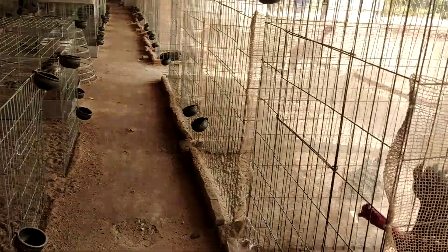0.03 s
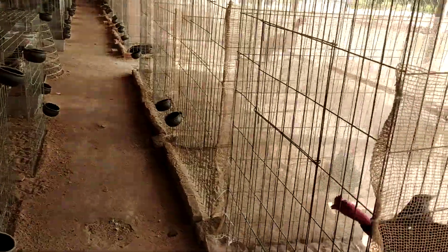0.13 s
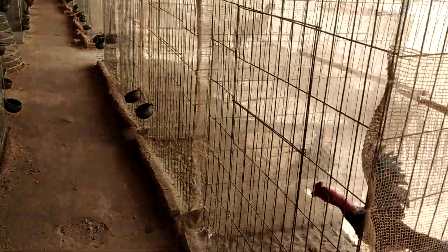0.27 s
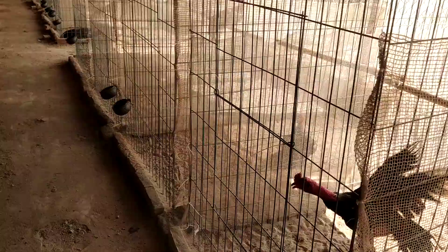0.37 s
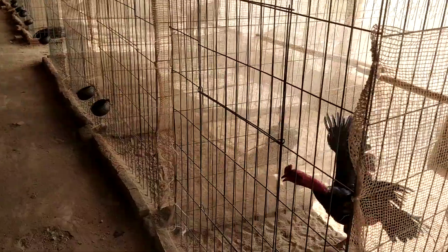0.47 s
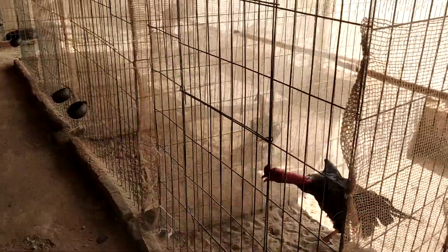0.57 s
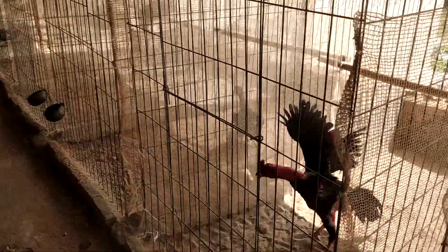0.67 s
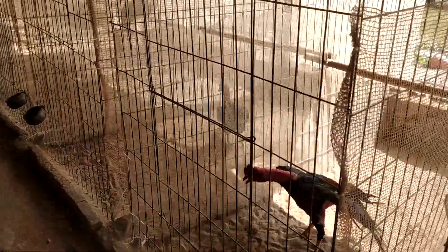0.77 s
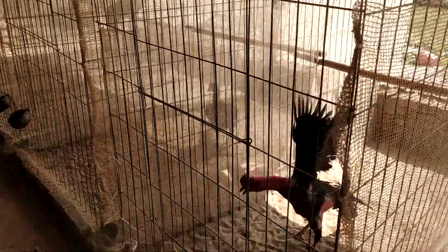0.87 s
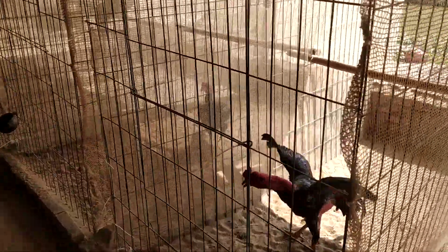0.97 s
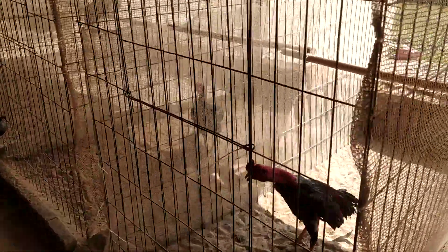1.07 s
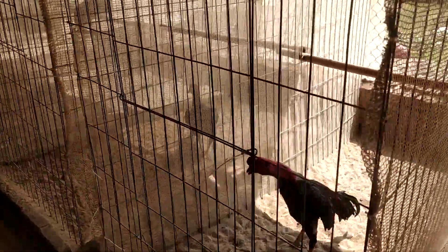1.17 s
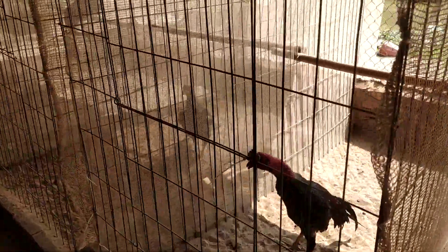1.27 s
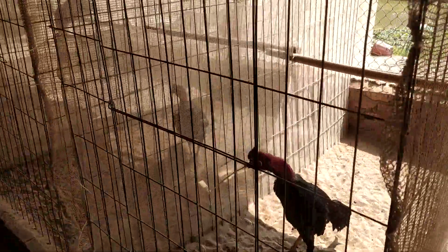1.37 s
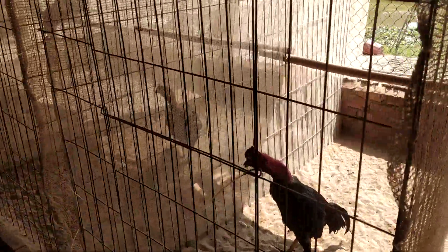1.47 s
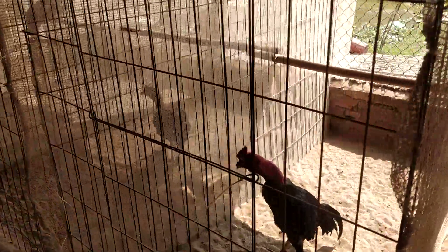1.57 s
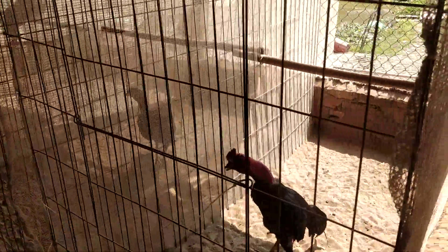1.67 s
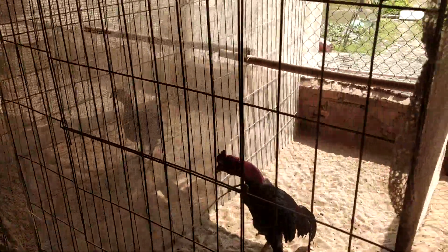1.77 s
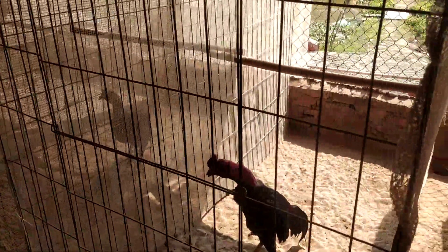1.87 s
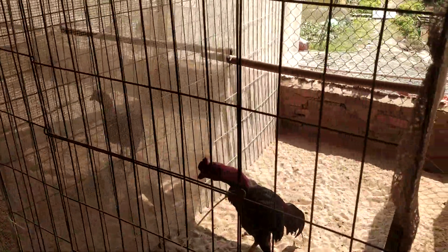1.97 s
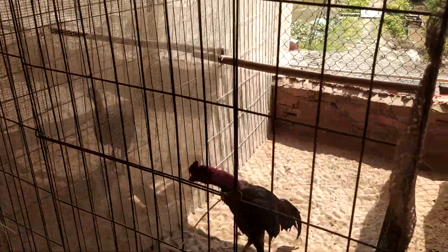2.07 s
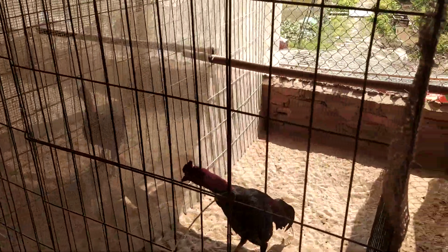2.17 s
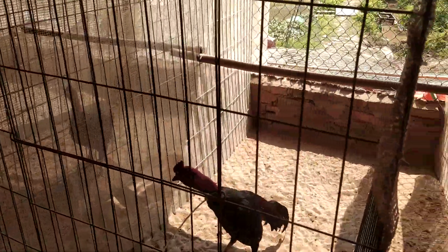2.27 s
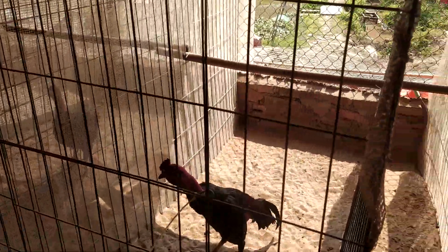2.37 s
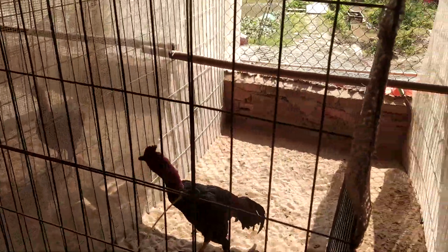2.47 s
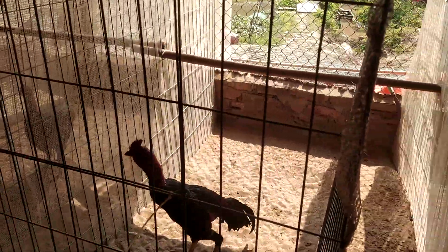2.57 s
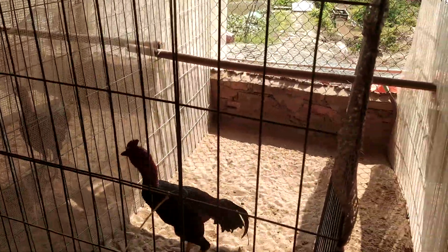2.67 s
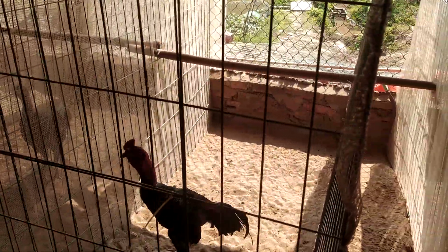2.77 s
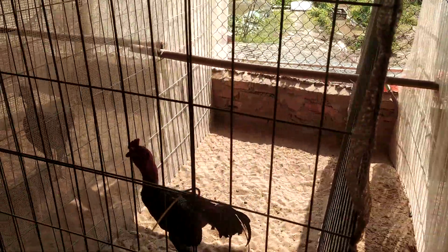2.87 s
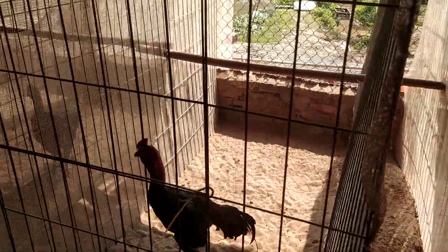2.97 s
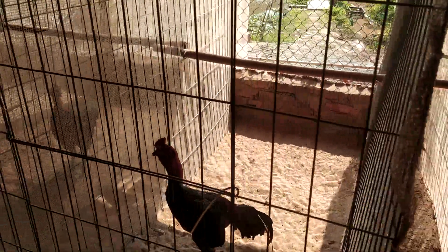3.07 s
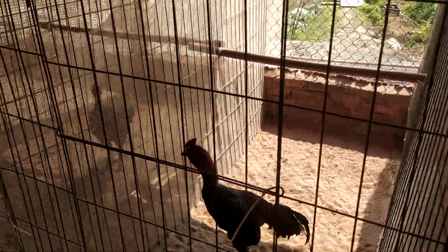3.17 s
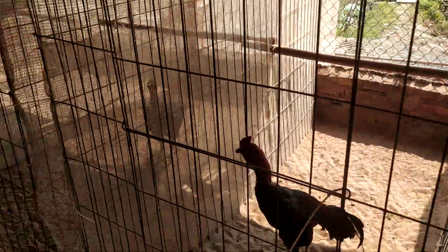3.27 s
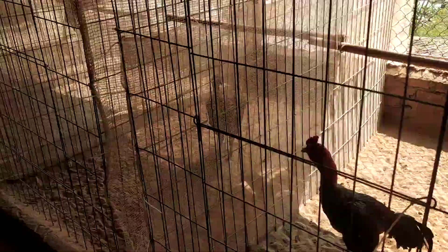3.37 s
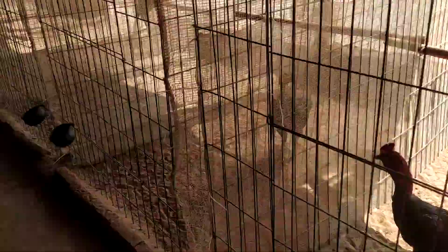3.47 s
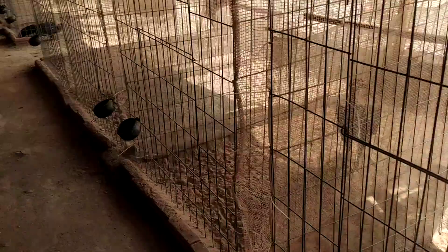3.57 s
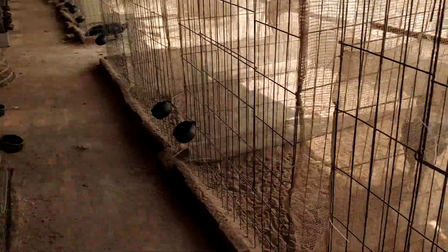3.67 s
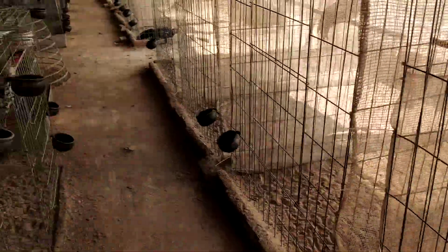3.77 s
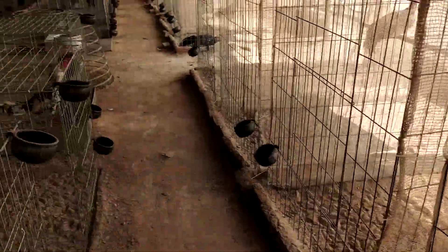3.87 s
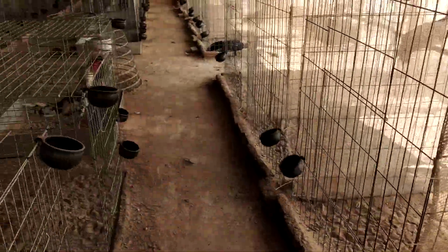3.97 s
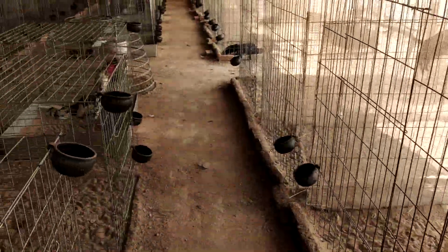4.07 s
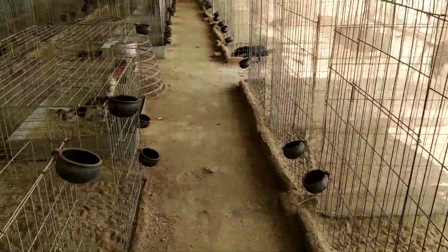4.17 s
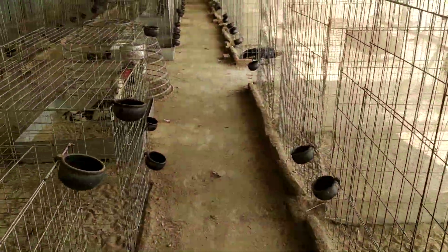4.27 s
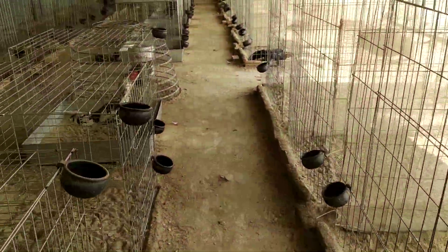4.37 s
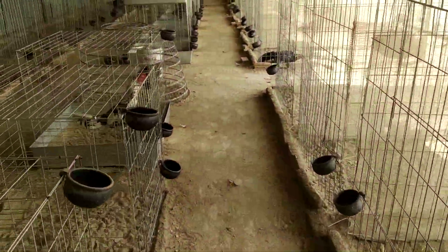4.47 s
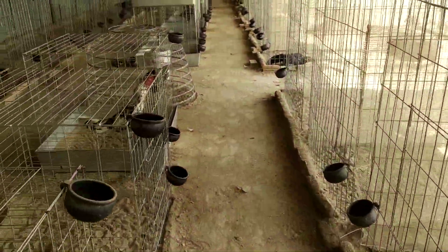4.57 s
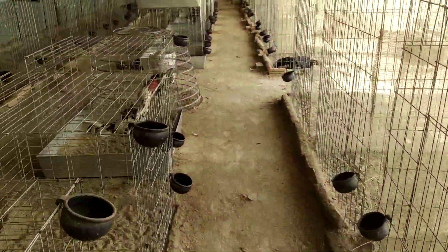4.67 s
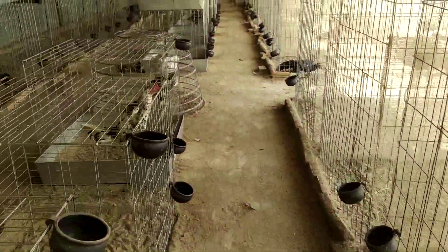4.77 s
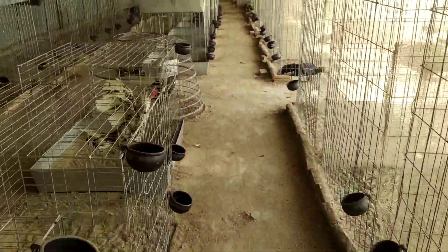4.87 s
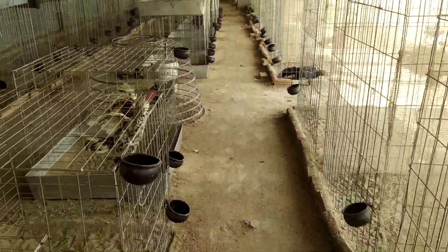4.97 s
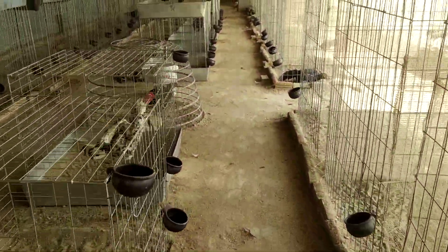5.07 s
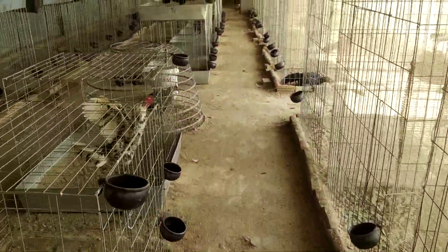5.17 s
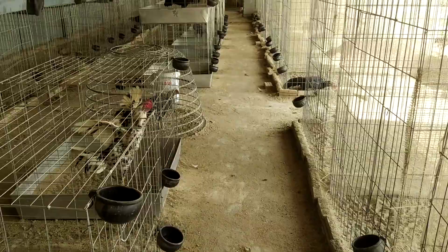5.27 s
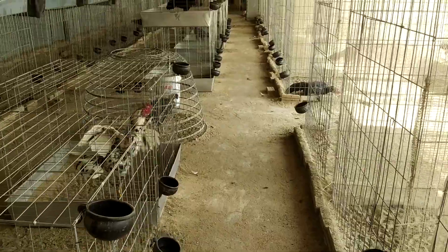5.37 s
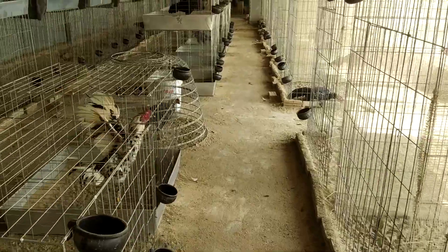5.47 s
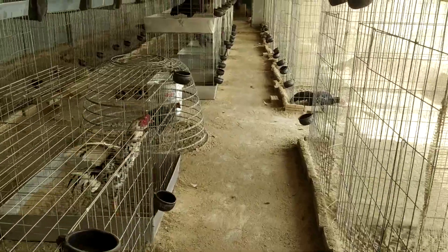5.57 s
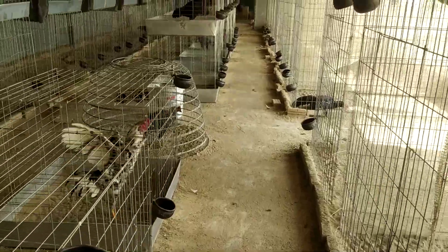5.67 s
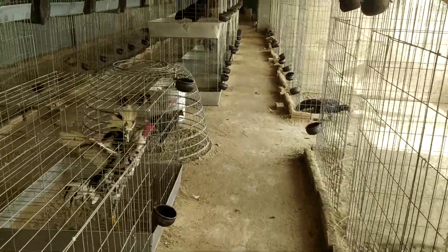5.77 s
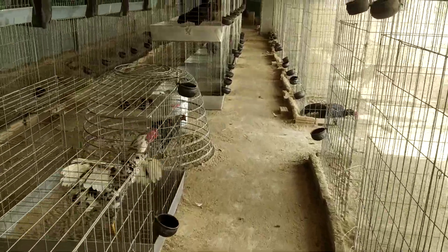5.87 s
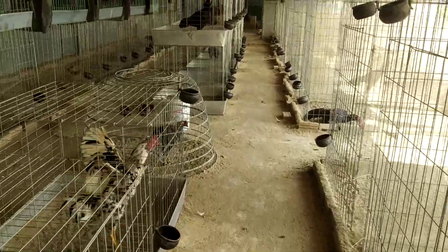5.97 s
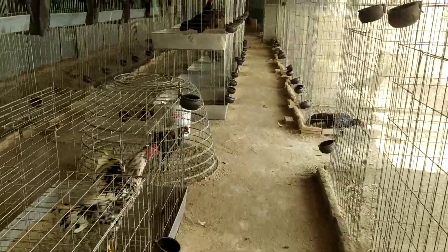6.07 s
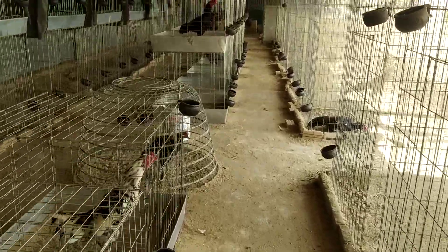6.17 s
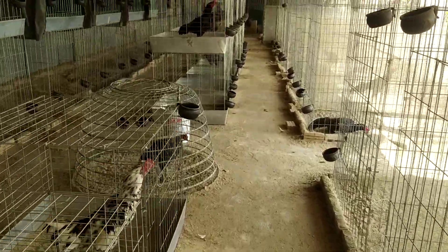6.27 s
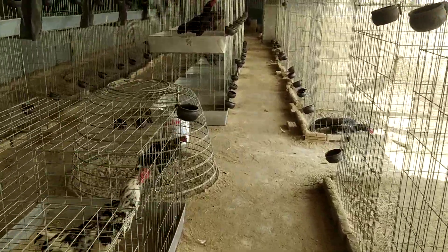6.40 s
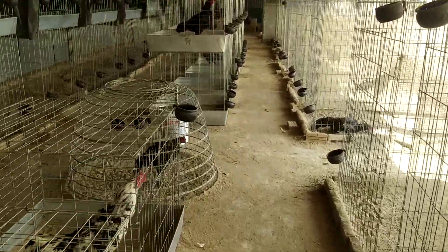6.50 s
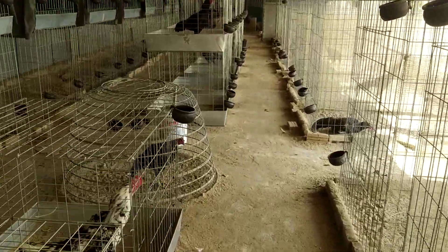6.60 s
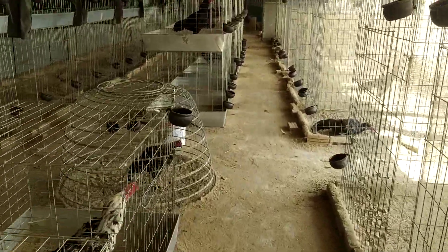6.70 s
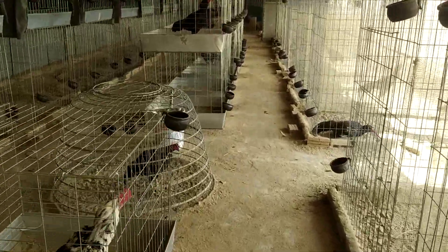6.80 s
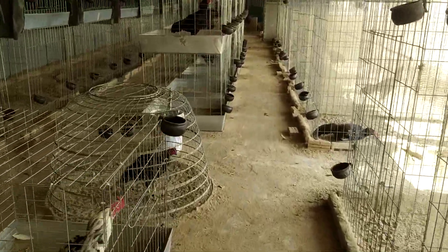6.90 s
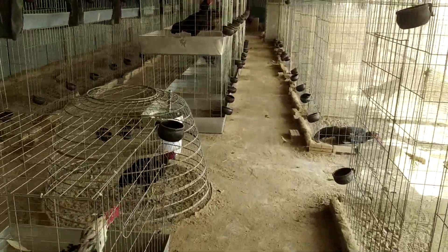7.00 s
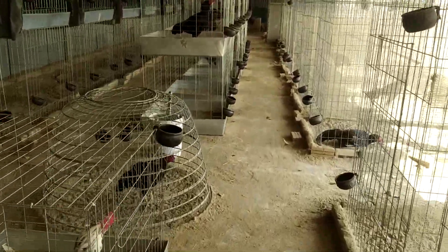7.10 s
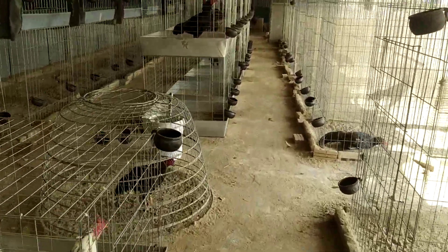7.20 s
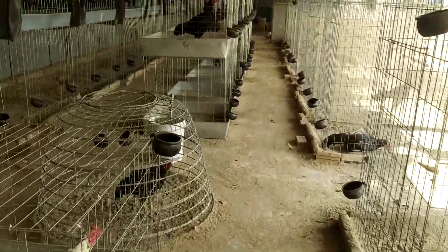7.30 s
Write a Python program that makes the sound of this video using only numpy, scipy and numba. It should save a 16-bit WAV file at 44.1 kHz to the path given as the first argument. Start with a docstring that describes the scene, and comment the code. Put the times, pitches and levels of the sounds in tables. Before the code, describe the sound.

A close rooster claps its wings five times and crows hoarsely, then two more answer from down the aisle of a poultry shed.

```python
"""A far bird calls and a rooster close by claps its wings five times, in a poultry shed with rows of wire cages.
The rooster crows in four syllables; two more down the aisle answer, overlapping. Feet scuff the gritty
floor, cages tick, far birds call and an engine throbs outside. Crows are sharp pulses, roughened and sent
through throat resonances; far calls are nearly pure tones; wings and floor are short bursts of shaped
noise; the engine is a train of dull beats. Reflections of the shed surround all but the outdoor sounds."""
import sys
import numpy as np
from scipy import signal
from scipy.fft import rfft, irfft, next_fast_len
from scipy.io import wavfile
from scipy.ndimage import uniform_filter1d
from numba import njit

SR = 44100
rng = np.random.default_rng(int(sys.argv[2]) if len(sys.argv) > 2 else 0)


def waveform_to_disk(signal):
    """Save audio, clipped to [-1, 1], as 16-bit WAV at the path in sys.argv[1]."""
    frames = np.transpose(np.atleast_2d(signal))
    scaled = np.clip(frames, -1, 1) * 32767
    samples = np.round(scaled).astype(np.int16)
    wavfile.write(sys.argv[1], SR, samples)


N = 323677
T = np.arange(N) / SR


def from_db(db):
    """Turns decibels into a factor of amplitude."""
    return 10 ** (np.asarray(db) / 20)


def rms_one(x):
    """Scales a signal to an rms level of 1."""
    return x / np.sqrt(np.mean(x ** 2) + 1e-20)


def in_time(rows):
    """The columns of a table, joined by straight lines."""
    s, *columns = np.transpose(rows)
    return [np.interp(T, s, c) for c in columns]


def cut(x, hz, kind, order=2):
    """Removes the sound on one side of a frequency, or inside or outside a band."""
    return signal.sosfilt(signal.butter(order, hz, kind, fs=SR, output="sos"), x)


def drift(rate_hz):
    """Random wander up to the given rate; spread 1."""
    settled = cut(rng.standard_normal(N + SR), rate_hz, "low")[SR:]
    return rms_one(settled)


def resonate(x, hz, width_hz):
    """One resonance with gain 1 on top."""
    r = np.exp(-np.pi * width_hz / SR)
    top = np.array([1, 0, -1]) * (1 - r * r) / 2
    bottom = [1, -2 * r * np.cos(2 * np.pi * hz / SR), r * r]
    return signal.lfilter(top, bottom, x + 1e-18)


@njit
def moving_resonance(x, hz, width_hz):
    """A resonance whose centre moves; gain 1 on top."""
    r = np.exp(-np.pi * width_hz / SR)
    y = np.zeros(len(x))
    for i in range(2, len(x)):
        drive = (1 - r * r) / 2 * (x[i] - x[i - 2])
        y[i] = drive + 2 * r * np.cos(2 * np.pi * hz[i] / SR) * y[i - 1] - r * r * y[i - 2]
    return y


def at_hz(points, hz):
    """Reads a curve at any frequency, along a logarithmic frequency scale."""
    known_hz, values = np.transpose(points)
    return np.interp(np.log(hz + 1), np.log(known_hz), values)


def arch(start, length, t=T):
    """A rounded swell from 0 to 1 and back."""
    return np.sqrt(np.sin(np.pi * np.clip((t - start) / length, 0, 1)).clip(0))


def bursts(times, levels_db, rise_s, t60):
    """Envelope of blows that swell quickly and die away by 60 dB in t60 seconds."""
    out = np.zeros(N)
    for s, db in zip(times, levels_db):
        span = slice(max(0, int((s - .1) * SR)), int((s + .4) * SR))
        age = T[span] - s
        decay = from_db(db - 60 * np.maximum(age, 0) / t60)
        out[span] += decay * np.exp(-(np.minimum(age, 0) / rise_s) ** 2)
    return out


# How alike the two channels are in the shed.
# Each row: frequency in Hz, coherence from 0 (unrelated) to 1 (the same).
LIKENESS = [(100, 0.96), (600, 0.78), (1400, 0.26), (3000, 0.037), (10000, 0.029)]


def diffuse(spectrum=None, size=N):
    """Stereo noise arriving from all sides: alike in the bass, unrelated in the treble; rms 1."""
    length = next_fast_len(size)
    hz = np.fft.rfftfreq(length, 1 / SR)
    mid, side = rfft(rng.standard_normal((2, length)))
    alike = np.clip(at_hz(LIKENESS, hz), 0, 1)
    both = np.sqrt(1 + alike) * mid + np.sqrt(1 - alike) * side * [[1], [-1]]
    if spectrum is not None:
        # beyond both ends of the given spectrum the noise falls away
        ends = (1 + (spectrum[0][0] / (hz + 1)) ** 4) * (1 + (hz / spectrum[-1][0]) ** 4)
        both = both * from_db(at_hz(spectrum, hz)) / np.sqrt(ends)
    return rms_one(irfft(both, length)[:, :size])


SHED_T60_S, SHED_TREBLE_T60_S = 0.38, 0.23


def shed(x, wet_db, pan_db):
    """Direct sound plus the dense reflections of floor, walls and roof; the treble dies first."""
    age = T[:SR // 2]
    noise = diffuse(size=len(age))
    low = cut(noise, 1600, "low", order=1)
    low_tail = low * from_db(-60 * age / SHED_T60_S)
    treble_tail = (noise - low) * from_db(-60 * age / SHED_TREBLE_T60_S)
    tail = (low_tail + treble_tail) * (age > .003)
    tail = rms_one(tail) / np.sqrt(len(age))
    x = x * np.ones((2, 1))
    wet = signal.fftconvolve(x, tail, axes=1)[:, :N]
    direct = x * from_db([[pan_db / 2], [-pan_db / 2]])
    return (direct + from_db(wet_db) * wet) / np.sqrt(1 + from_db(2 * wet_db))


# Colour of the outdoor background. Each row: frequency in Hz, relative level in dB per Hz.
OUTDOOR_COLOUR = [(50, -2), (66, 0), (100, -5.5), (160, -5), (240, -8.5), (350, -18), (580, -11.5),
                  (900, -29), (1500, -25.5), (3000, -35.5), (9000, -34), (15500, -41.5)]
OUTDOOR_DB = -54


def outdoor_background():
    """A steady murmur from all sides, made of shaped noise."""
    return from_db(OUTDOOR_DB) * diffuse(OUTDOOR_COLOUR)


# Loudness of the engine as the microphone turns. Each row: time in seconds, level in dB.
ENGINE_LEVEL = [(1.5, -66), (2.3, -55.5), (4.4, -53.5), (6.0, -59.5)]


def engine(firings_hz):
    """A far single-cylinder engine: dull exhaust beats that swell and fade as the microphone turns."""
    beats = np.diff(np.floor(T * firings_hz), prepend=0)   # one click per firing
    boom = resonate(resonate(beats, 120, 140), 120, 140)
    exhaust = cut(boom, 180, "low", order=4)
    level_db, = in_time(ENGINE_LEVEL)
    return from_db(level_db) * rms_one(exhaust)


def whistle(notes, overtones_db, waver):
    """Nearly pure notes, with or without weak overtones; each swells once and bends through three pitches."""
    out, unsteady = np.zeros(N), 1 + waver * drift(119)
    for s, length, first_hz, middle_hz, last_hz, db in notes:
        span = slice(max(0, int(s * SR)), int((s + length) * SR))
        bend = np.polyfit([0, .5, 1], [first_hz, middle_hz, last_hz], 2)
        pitch = np.polyval(bend, (T[span] - s) / length) * unsteady[span]
        phase = 2 * np.pi * np.cumsum(pitch) / SR
        overtones = sum(from_db(level) * np.sin(k * phase) for k, level in enumerate(overtones_db, 2))
        out[span] += np.sqrt(2) * from_db(db) * arch(s, length, T[span]) * (np.sin(phase) + overtones)
    return out


# Calls and a cluck of far birds. Each row: start in seconds, length in seconds,
# first, middle and last pitch in Hz (before a slight waver), relative level in dB.
FAR_CALLS = [(0.0, 0.33, 1516, 1521, 1470, -41), (2.42, 0.28, 653, 615, 590, -65),
             (2.5, 0.26, 1126, 1220, 1260, -64), (2.48, .2, 1890, 1810, 1750, -67),
             (2.577, 0.023, 539, 491, 430, -37.5), (3.07, 0.26, 1830, 1770, 1725, -72),
             (3.95, 0.13, 400, 420, 442, -51.5), (3.97, 0.26, 574, 651, 673, -58.5),
             (6.8, 0.3, 1150, 1178, 1217, -57.5), (7.0, 0.28, 1187, 1200, 1210, -50.5),
             (7.24, 0.11, 1180, 1165, 1160, -60)]


def far_birds():
    """Far birds: nearly pure notes with two weak overtones, softened by the shed."""
    calls = whistle(FAR_CALLS, overtones_db=[-24, -32], waver=0.019)
    return shed(calls, wet_db=-2.5, pan_db=-1.5)


# Colours of the wing slap, the feathers and the swept air.
# Each row: frequency in Hz, relative level in dB per Hz.
SLAP = [(120, -28), (200, 10), (362, -4), (729, 2.5), (967, -3), (1490, -1.5), (2290, -7.5), (3080, -9.5),
        (5000, -32), (6500, -45), (11000, -120)]
FEATHER = [(1470, -25.5), (2400, -1.5), (3060, -12), (3660, -9), (9810, -4.5), (15000, -14), (16000, -22)]
AIR = [(47, -24.5), (80, -8.5), (199, 0.5), (343, -10), (424, 0.5), (549, -12), (658, -7), (2000, -13),
       (3000, -21.5), (6600, -32.5)]
# Wing claps. Each row: time in seconds, then relative levels in dB of the snap, the slap,
# the air thump and the feather crack.
CLAPS = [(0.043, -9.5, -31, -37.5, -25), (0.251, -8, -30.5, -40, -28.5), (0.471, -7.5, -31, -38, -35.5),
         (0.701, -43, -31, -41.5, -26), (0.941, -17, -27.5, -35, -20)]
# The wings sweep up before each clap and down after it.
# Each row: delay from the clap in seconds, air level in dB, feather level in dB.
WING_BEAT = [(-.038, -38, -41), (.072, -46, -62)]
# Loose shakes of the feathers. Each row: time in seconds, air level in dB, feather level in dB.
RUFFLES = [(.005, -46, -44), (.377, -48, -47.5), (.633, -47.5, -56)]
# Stiff feathers flick against each other between the claps.
# Each row: time in seconds, crack level in dB, slap level in dB.
FLICKS = [(.054, -21, -24), (0.21, -30, -43), (0.374, -58, -30.5), (0.429, -37, -49), (0.656, -27, -38),
          (0.909, -45, -39)]


def wings():
    """Each beat sweeps air, then the wings meet: a crack of feathers, a slap and a low puff."""
    s, peak_db, slap_db, thump_db, crack_db = np.transpose(CLAPS)
    slap = from_db(6.5) * bursts(s, slap_db, rise_s=0.0017, t60=0.07) * diffuse(SLAP)
    crack = from_db(2.0) * bursts(s, crack_db, rise_s=0.00038, t60=0.05) * diffuse(FEATHER)
    snap = from_db(-9) * bursts(s + .002, peak_db, rise_s=.0002, t60=.008) * diffuse(FEATHER)
    push = bursts(s + 0.0068, thump_db, rise_s=0.0023, t60=0.01)   # air squeezed out between the wings
    puff = from_db(17.5) * resonate(push, hz=78.9, width_hz=93)

    strokes = [(clap + delay, air, feather) for clap in s for delay, air, feather in WING_BEAT]
    at, air_db, feather_db = np.transpose(strokes + RUFFLES)
    sweep = bursts(at, air_db, rise_s=0.025, t60=0.27) * diffuse(AIR)
    grain = rms_one(from_db(3.7 * drift(394.5)))
    rustle = bursts(at, feather_db, rise_s=0.0042, t60=0.42) * diffuse(FEATHER) * grain

    at, flick_db, pat_db = np.transpose(FLICKS)
    flicks = bursts(at, flick_db, rise_s=0.0007, t60=0.046) * diffuse(FEATHER)
    pats = bursts(at, pat_db, rise_s=0.0013, t60=0.046) * diffuse(SLAP)
    return shed(slap + crack + snap + puff + sweep + rustle + flicks + pats, wet_db=-7.5, pan_db=0.0)


# Before the voice breaks upward it is lower (share of pitch) and softer.
LOW_REGISTER_DROP, LOW_REGISTER_DB = .23, -2.5
# Each fresh syllable scoops down onto its pitch: share of pitch, time in seconds.
SCOOP_SHARE, SCOOP_S = .6, .0035
DROOP_POWER = 2.4   # the pitch droops late in a syllable, as this power of the time gone by
EFFORT_RELAX = .45   # effort relaxes by this share toward the end of a syllable
# After each syllable the voice dies away, and its upper partials go faster by the second rate.
RELEASE_DB_PER_S, DULLING_DB_PER_S = 441, 151


def sing(syllables, hoarseness, push):
    """Gain, pitch, brightness, rasp, roughness and progress; one swell of effort per syllable drives them."""
    attack_s, build_s, push_pitch, push_bright_db, push_rasp_db = push
    gain, controls = np.zeros(N), np.zeros((5, N))
    controls[0] = syllables[0][3]
    for syllable, (slack, strained) in zip(syllables, hoarseness):
        start, length, low_s, hz, droop, db, fade_db, bright_db, rasp_db = syllable
        span = slice(int(start * SR), int((start + length + .2) * SR))
        age = T[span] - T[span][0]
        done = np.minimum(age / length, 1)
        overtime = np.maximum(age - length, 0)
        low = 1 / (1 + (age / max(low_s, 1e-4)) ** 10)
        fresh = 1 - min(gain[span][0] / from_db(db), 1)   # near 0 when slurred on from the syllable before

        still_slack = fresh * np.exp(-(np.maximum(age - low_s / 4, 0) / build_s) ** 2)
        effort = (1 - still_slack) * (1 - EFFORT_RELAX * done ** 6)
        level_db = db - fade_db * done + LOW_REGISTER_DB * low - RELEASE_DB_PER_S * overtime
        attack = np.minimum(age / attack_s, 1) ** 9.0
        gain[span] = np.maximum(gain[span], attack * from_db(level_db))

        sag = droop * np.minimum(age / length, 1.2) ** DROOP_POWER
        scoop = 1 + fresh * SCOOP_SHARE * np.exp(-age / SCOOP_S)
        # strained syllables climb to their pitch
        climb = fresh * push_pitch * np.sqrt(strained) * np.exp(-(age / build_s) ** 2)
        below = np.maximum(LOW_REGISTER_DROP * low, climb)
        dull_db = DULLING_DB_PER_S * overtime
        controls[:, span] = (hz * scoop * (1 - below) * (1 - sag),
                             bright_db - push_bright_db * (1 - effort) - dull_db,
                             rasp_db - push_rasp_db * (1 - effort) - dull_db,
                             slack + (strained - slack) * effort,
                             done)
    return gain, *controls


HISS = .22   # share of rushing air in a fully hoarse voice


def syrinx(pitch, rough, jitter, flutter_hz, halves, rattle):
    """Sharp pulses; when hoarse their timing scatters, every other one weakens and air hisses through."""
    unsteady = 1 + .002 * drift(40) + jitter * rough * drift(flutter_hz)
    phase = 2 * np.pi * np.cumsum(pitch * unsteady) / SR
    half = phase / 2 + 1e-6
    pulses = np.sin(45 * half) / np.sin(half) - 1   # twenty-two equal harmonics
    strength = 1 + halves * np.sqrt(rough) * np.cos(half) * (1 + 1.5 * drift(30))
    air = HISS * rough * rng.standard_normal(N) * (1 + np.cos(phase))   # strongest at each opening
    return (rms_one(pulses) * strength + air) * (1 + rattle * rough * drift(220))


def evened(x):
    """Holds the running level at 1."""
    return x / np.sqrt(np.abs(uniform_filter1d(x * x, SR // 60)) + 1e-9)


WANDER_HZ = 14   # how fast the resonances wander
RASP_GRAIN_DB = 2.5   # unevenness of the rasp


def throat(source, resonances, gap_hz, stretch, bright_db, rasp_db, beak, wander):
    """Steep throat resonances; the upper ones follow the beak and all wander, each on its own."""
    body, bright, rasp = np.zeros((3, N))
    for hz, width, db in resonances:
        centre = hz * stretch * (1 + wander * drift(WANDER_HZ)) * (beak if hz > 1750 else 1)
        # two passes narrow the peak, so each is made wider
        once = moving_resonance(source, centre, 1.5 * width)
        ring = from_db(db) * moving_resonance(once, centre, 1.5 * width)
        if hz < 1750:
            body += ring
        elif hz < 4200:
            bright += ring
        else:
            rasp += ring
    body = cut(cut(body, 515, "high", order=5), 2210, "low", order=5)
    # the windpipe swallows the gap between two resonances
    bright = cut(bright, [gap_hz - 260, gap_hz + 260], "bandstop")
    bright = cut(bright, 4500, "low", order=5)
    rasp = cut(rasp, 4600, "high", order=6)
    grainy_db = rasp_db + RASP_GRAIN_DB * drift(60)
    return evened(body) + from_db(bright_db) * evened(bright) + from_db(grainy_db) * evened(rasp)


GAPE_POWER = 0.46   # the beak gapes as the pitch rises: resonances go with pitch to this power
HOARSE_SWING = .35   # unevenness of the hoarseness, as a share
LURCH = .027   # a hoarse voice lurches in pitch by this share
WARBLE_DB = 4   # swing of the level, up and down, at full warble


def crow(syllables, hoarseness, push, resonances, beak_motion, rest_hz, gap_hz, jitter, flutter_hz,
         halves, rattle, warble=0):
    """One bird, unevenly hoarse; a warble makes the voice louder, higher and cleaner on each beat."""
    gain, pitch, bright_db, rasp_db, rough, done = sing(syllables, hoarseness, push)
    closing, wander = beak_motion
    stretch = (pitch / rest_hz) ** GAPE_POWER
    beak = 1 + closing * (.5 - done)
    rough = np.clip(rough * (1 - .85 * warble) * (1 + HOARSE_SWING * drift(25)), 0, 1)
    pitch = pitch * (1 + LURCH * rough * drift(22))
    warbled = pitch * (1 + 0.045 * (warble - np.abs(warble)))   # the pitch dips between the beats
    source = syrinx(warbled, rough, jitter, flutter_hz, halves, rattle)
    voice = throat(source, resonances, gap_hz, stretch, bright_db, rasp_db, beak, wander)
    return gain * from_db(WARBLE_DB * warble) * voice


def scattered(x, bass_pan_db, treble_pan_db):
    """Cages and bowls scatter the treble: a few echoes within milliseconds, other ones at each side."""
    out = np.zeros((2, N))
    bass = cut(cut(x, 1050, "low"), 1050, "low")
    treble = cut(cut(x, 1050, "high"), 1050, "high")
    heights = .5 * .87 ** np.arange(8)
    for side, lean in zip(out, (.5, -.5)):
        lags = np.append(0, rng.uniform(.0003, .009, 7) * SR).astype(int)
        echoes = sum(h * np.pad(treble, (lag, 0))[:N] for h, lag in zip(heights, lags))
        side += from_db(lean * bass_pan_db) * bass + from_db(lean * treble_pan_db) * echoes
    return out


# Syllables of the near rooster. Each row: start in seconds, length in seconds, time in the low register
# in seconds, settled pitch in Hz, final droop as a share of pitch, relative level in dB, fade in dB,
# then brightness and high rasp at full effort, both in dB against the body of the voice.
NEAR = [(0.996, 0.16, 0.0026, 712, 0.03, -12.5, 7.5, -2.5, -11.5),
        (1.259, 0.14, 0.0029, 793, 0.034, -14.5, -2.5, -2.5, -7),
        (1.493, 0.35, 0.041, 718.8, 0.036, -11, 4.5, -11.5, -17.5),
        (1.848, 0.1, 0.00086, 575.6, 0.05, -17, 3, -8, -19),
        (2.096, 0.13, 0.0017, 665, .1, -13.5, 7, -13.5, -11)]
# Hoarseness of each syllable. Each row: roughness from 0 to 1 when slack, and at full effort.
NEAR_HOARSE = [(.06, .75), (.15, .55), (.22, .58), (.6, .7), (.14, .05)]
# How the bird leans into a syllable: attack in seconds, time to build full effort in seconds, then what
# full effort adds: share of pitch, brightness in dB, rasp in dB.
NEAR_PUSH = (0.012, 0.045, .11, 6.4, 11)
# Throat and beak resonances. Each row: frequency at the resting pitch in Hz, width in Hz, relative level in dB.
NEAR_THROAT = [(602, 280, 1.5), (910, 160, -13), (1453, 69, 1), (2353, 164, 0), (3363, 297, -9.5),
               (5180, 700, -3.5), (6050, 680, -3), (7420, 810, -4), (9650, 1400, -7.5), (10870, 420, -12.5),
               (12000, 1400, -19)]
# Partials that meet a throat resonance and ring out. Each row: start in seconds, length in seconds,
# first, middle and last pitch in Hz (before a slight waver), relative level in dB.
NEAR_RINGING = [(1.38, 0.031, 1520, 1512, 1490, -22.5), (1.488, 0.029, 1600, 1436, 1430, -25),
                (2.094, 0.016, 1150, 879.5, 780, -28.5), (2.122, 0.041, 1300, 1326, 1312, -21)]
# The share by which upper resonances sink through a syllable, and by which all resonances wander.
NEAR_BEAK = (.02, .018)
WARBLE_HZ, WARBLE_BEAT_S = 24.2, 1.626   # rate, and the time of one beat
WARBLE_SWING = .4   # unevenness of the warble's depth, as a share


def near_rooster():
    """The long third syllable warbles about 24 times a second, then falls to a lower, rough ending."""
    start, length, low_s = NEAR[2][:3]
    depth = np.minimum(3 * arch(start + low_s, length - low_s), 1)
    warble = depth * np.cos(2 * np.pi * WARBLE_HZ * (T - WARBLE_BEAT_S))
    warble = warble * (1 + WARBLE_SWING * drift(10))
    voice = crow(NEAR, NEAR_HOARSE, NEAR_PUSH, NEAR_THROAT, NEAR_BEAK, rest_hz=751, gap_hz=2687,
                 jitter=0.11, flutter_hz=155.0, halves=0.62, rattle=1.0, warble=warble)
    ringing = whistle(NEAR_RINGING, overtones_db=[], waver=0.015)
    return shed(scattered(voice, bass_pan_db=-2.5, treble_pan_db=1.0) + ringing, wet_db=-7, pan_db=0.1)


# Colour of the grit. Each row: frequency in Hz, relative level in dB per Hz.
GRIT = [(290, -48), (500, -41), (530, -3.5), (688, 0.5), (2890, -7.5), (3860, -7.5), (6700, -11.5),
        (8960, -10), (16000, -25)]
# Feet scuff the gritty floor. Each row: start in seconds, length in seconds, level in dB.
SCUFFS = [(2.397, 0.65, -61.5), (2.866, 0.17, -47.5), (3.485, 0.13, -54.5), (3.636, 0.34, -58),
          (4.04, 0.048, -57), (6.745, 0.34, -53.5), (7.19, 0.18, -60)]
# Ticks of grit and cage wire. Each row: time in seconds, relative peak level in dB,
# gritty body in dB against the bright tick.
TICKS = [(2.651, -37, 1), (2.859, -21, -9.5), (2.9077, -25, -9), (3.338, -56, 4.5), (3.408, -57, 14),
         (3.563, -47, -5), (3.8302, -37.5, 11.5), (3.903, -37.5, 11), (5.2082, -14.5, 4),
         (5.7827, -3.5, -1), (5.798, -12, -11), (5.955, -17.5, -18), (6.968, -28, 4), (7.1055, -39, 12.5),
         (7.2486, -46.5, 17)]


def floor_and_cages():
    """Grit crunches in uneven grains; now and then something ticks sharply."""
    pressure = sum(from_db(db) * arch(s, length) for s, length, db in SCUFFS)
    crunch = pressure * rms_one(from_db(5.1 * drift(107))) * diffuse(GRIT)
    s, peak_db, body_db = np.transpose(TICKS)
    bright = bursts(s, peak_db, rise_s=0.00015, t60=0.016) * cut(diffuse(FEATHER), 4900, "high")
    gritty = cut(diffuse(GRIT), 670, "high", order=1)
    body = bursts(s, peak_db + body_db, rise_s=0.000062, t60=0.014) * gritty
    ticks = from_db(-11.5) * (bright + body)
    return shed(crunch + ticks, wet_db=-3.5, pan_db=-1.0)


# Syllables of the second and third roosters. Each row: start in seconds, length in seconds, time in the
# low register in seconds, settled pitch in Hz, final droop as a share of pitch, relative level in dB,
# fade in dB, then brightness and high rasp at full effort, both in dB against the body of the voice.
SECOND = [(4.13, 0.086, 0.0016, 564, 0.018, -27, 9.5, -10, -18.5),
          (4.331, .24, 0.092, 778.5, 0.016, -20.5, -4.5, -18, -21),
          (4.71, 0.14, 0.024, 832.5, 0.049, -22.5, -2.5, -12, -16.5),
          (4.87, 0.11, .002, 658.5, 0.075, -24, -1.5, -6, -16.5),
          (4.99, .34, 0.0023, 720.1, 0.024, -18.5, 2.5, -12, -20),
          (5.337, 0.39, 0.018, 780.2, 0.15, -21.5, -2, -13.5, -19.5),
          (5.77, 0.11, 0.0011, 557, 0.17, -19.5, 2.5, -11, -32)]
THIRD = [(4.63, 0.089, 0.001, 713, 0.016, -28.5, -5.5, -4, -21.5),
         (5.6, 0.52, 0.0027, 716.6, 0.021, -32.5, -3.5, -4.5, -14),
         (6.12, 0.39, 0.0025, 689, 0.045, -29.5, 1, -3.5, -18.5),
         (6.5, 0.2, 0.057, 714.6, 0.0346, -31, 1.5, -10, -18),
         (6.695, 0.048, 0.00082, 671.7, 0.15, -29, 4.5, -20, -21)]
# Hoarseness of each syllable. Each row: roughness from 0 to 1 when slack, and at full effort.
SECOND_HOARSE = [(.6, .6), (.4, .015), (.6, .1), (.7, .7), (.7, .65), (.6, .5), (.1, .04)]
THIRD_HOARSE = [(.9, .9), (.5, .45), (.8, .8), (.7, .25), (.1, .1)]
# How each bird leans into a syllable: attack in seconds, time to build full effort in seconds, then what
# full effort adds: share of pitch, brightness in dB, rasp in dB.
SECOND_PUSH = (0.011, 0.044, 0.032, 1.1, 1.8)
THIRD_PUSH = (0.011, 0.067, .04, 1, 0.38)
# Throat and beak resonances. Each row: frequency at the resting pitch in Hz, width in Hz, relative level in dB.
SECOND_THROAT = [(655, 198, 5.5), (1175, 37, 3), (1412, 243, 5.5), (1656, 195, -5.5), (2076, 510, 17.5),
                 (2980, 530, 3.5), (5270, 520, 12), (6720, 310, 13), (8180, 1540, 6), (10130, 2100, -1.5)]
THIRD_THROAT = [(593, 360, 10), (1100, 180, 6.5), (1482, 63, 17.5), (1760, 257, 24.5), (2900, 640, 7),
                (3660, 390, 1), (4990, 600, 11), (5530, 1100, 11), (8000, 430, 6), (10100, 780, -5),
                (10860, 2500, -3)]
# The lower tone that the other side of a syrinx adds, then partials that meet a throat resonance and ring
# out of the hoarse voices. Each row: start in seconds, length in seconds, first, middle and last pitch
# in Hz (before a slight waver), relative level in dB.
LOW_TONE = [(4.145, 0.05, 545, 558, 552, -34), (4.345, 0.12, 526.5, 563, 614, -29),
            (4.72, .14, 535, 586, 560, -24.5), (4.88, 0.13, 566, 580, 540, -28),
            (5.01, 0.12, 553, 588.6, 565, -25.5), (5.14, 0.16, 578, 574, 580, -31),
            (5.355, 0.166, 556, 587, 626, -22.5), (5.54, 0.17, 722, 679.6, 660, -26),
            (5.74, 0.051, 683, 691.4, 686, -21), (6.07, 0.4, 590.7, 560.2, 502, -27.5)]
RINGING = [(4.16, 0.083, 1320, 1388, 1436, -40), (4.16, 0.087, 2250, 2264, 2160, -42),
           (4.34, 0.26, 1070, 1144, 1107, -31), (4.73, 0.18, 1582, 1648, 1560, -24.5),
           (4.99, 0.48, 1395, 1425, 1428, -25), (5.36, 0.15, 1510, 1554, 1530, -31),
           (5.54, 0.2, 1440, 1340, 1330, -29), (5.5, 0.2, 2235, 2190, 2064, -33.5),
           (5.74, 0.11, 2100, 2115, 2100, -39), (5.8, 0.32, 2933, 2790, 2844, -47.5),
           (5.98, 0.17, 1420, 1444, 1386, -24), (6.08, 0.47, 1103, 1043, 1031, -38),
           (6.47, 0.26, 2180, 2190, 2120, -44), (6.56, 0.17, 1436, 1420, 1345, -33.5)]
# The share by which upper resonances sink through a syllable, and by which all resonances wander.
SECOND_BEAK, THIRD_BEAK = (.06, .042), (.06, .028)
TONE_FLICKER_DB = 2.5   # unevenness of the pure tones
AISLE_ROOM_DB, TONES_ROOM_DB = 1, -7   # the low tones carry down the aisle more directly


def answering_roosters():
    """Two birds down the aisle, with more of the shed around them."""
    second = crow(SECOND, SECOND_HOARSE, SECOND_PUSH, SECOND_THROAT, SECOND_BEAK, rest_hz=749, gap_hz=2390,
                  jitter=0.0703, flutter_hz=78.44, halves=1.0, rattle=1.0)
    third = crow(THIRD, THIRD_HOARSE, THIRD_PUSH, THIRD_THROAT, THIRD_BEAK, rest_hz=736, gap_hz=2450,
                 jitter=0.0565, flutter_hz=101.0, halves=1.0, rattle=1.0)
    low = whistle(LOW_TONE, overtones_db=[-11, -26, -26], waver=0.014)
    low = low * from_db(TONE_FLICKER_DB * drift(25))
    ringing = whistle(RINGING, overtones_db=[], waver=0.012)
    ringing = ringing * from_db(TONE_FLICKER_DB * drift(25))
    voices = scattered(second, bass_pan_db=1.2, treble_pan_db=1.5)
    voices = voices + scattered(third, bass_pan_db=0.5, treble_pan_db=-0.5)
    voices_in_shed = shed(voices, AISLE_ROOM_DB, pan_db=-0.5)
    ringing_in_shed = shed(ringing, AISLE_ROOM_DB, pan_db=1.0)
    return voices_in_shed + ringing_in_shed + shed(low, TONES_ROOM_DB, pan_db=-1.9)


def scene():
    """Adds up the outdoor sounds, the birds, the wings, the floor and the cages."""
    outdoors = outdoor_background() + engine(firings_hz=23.3)
    near = wings() + near_rooster()
    return outdoors + far_birds() + near + floor_and_cages() + answering_roosters()


CUTOFF_HZ = 16200


def record(dry):
    """The highest peaks are rounded, the microphone loses the deepest bass and the top is cut."""
    rounded = dry / (1 + (dry / .85) ** 8) ** (1 / 8)
    no_deep_bass = cut(rounded, 36, "high", order=3)
    top_cut = signal.cheby2(14, 60, CUTOFF_HZ + 600, fs=SR, output="sos")   # 60 dB down from 600 Hz higher
    return signal.sosfilt(top_cut, no_deep_bass)


dry = scene()
out = record(dry)
waveform_to_disk(out)
```